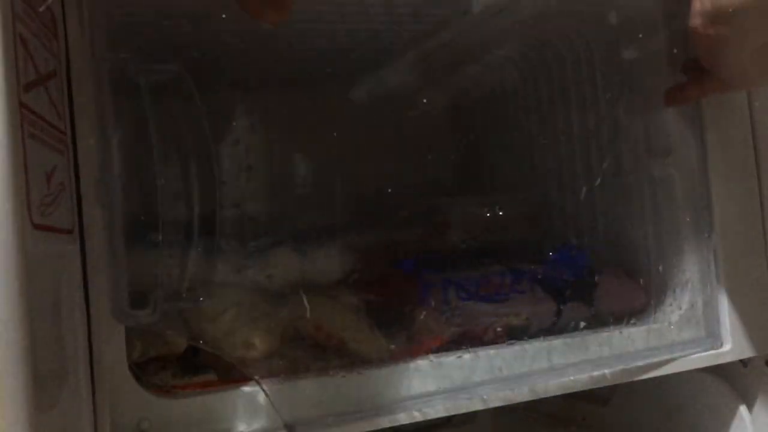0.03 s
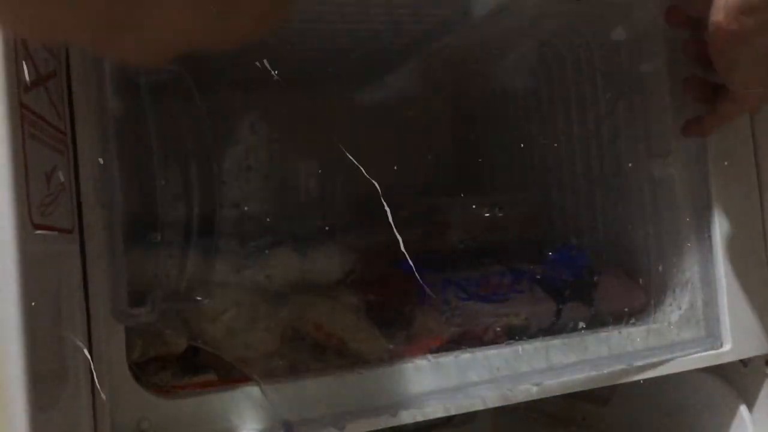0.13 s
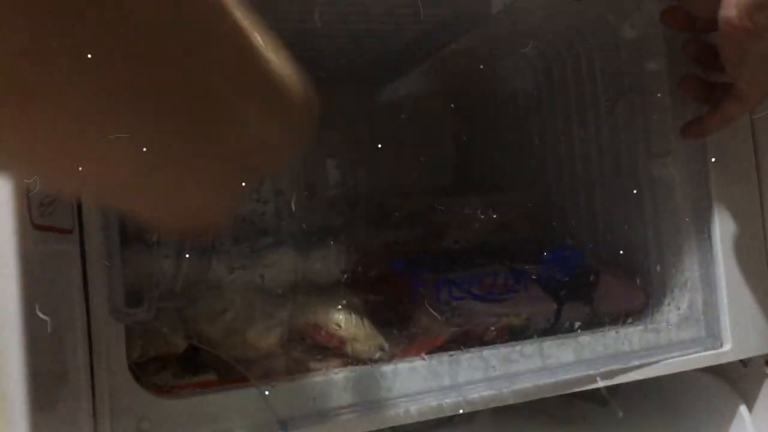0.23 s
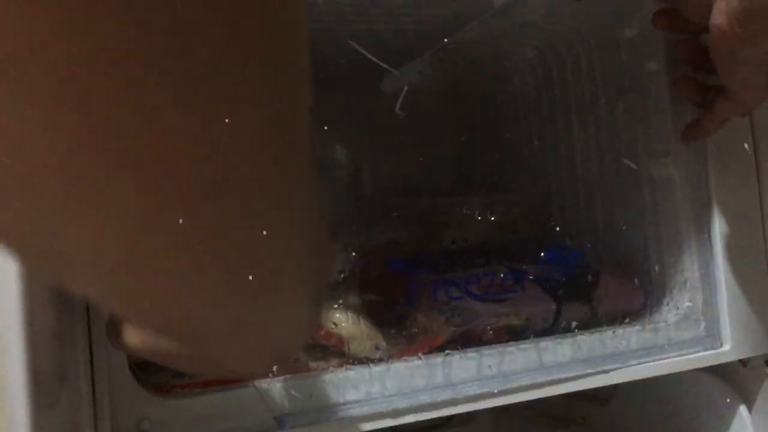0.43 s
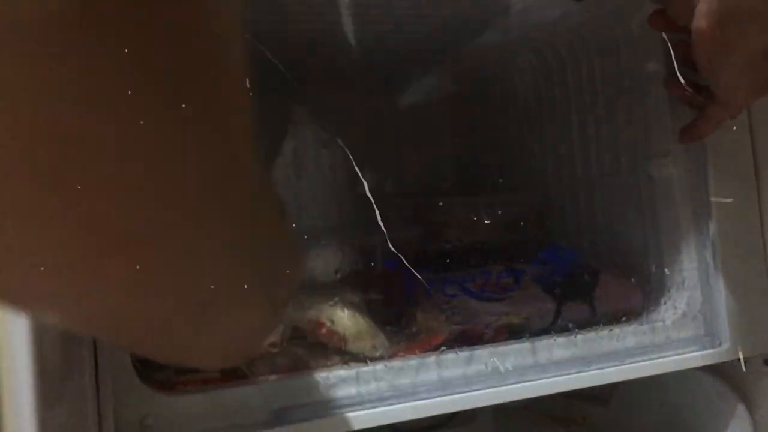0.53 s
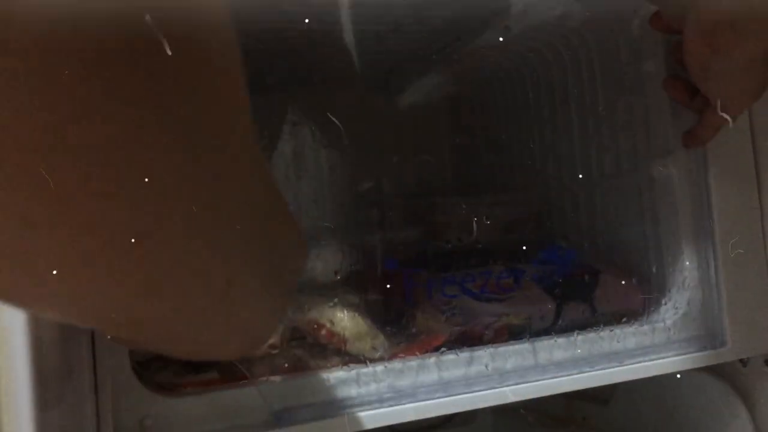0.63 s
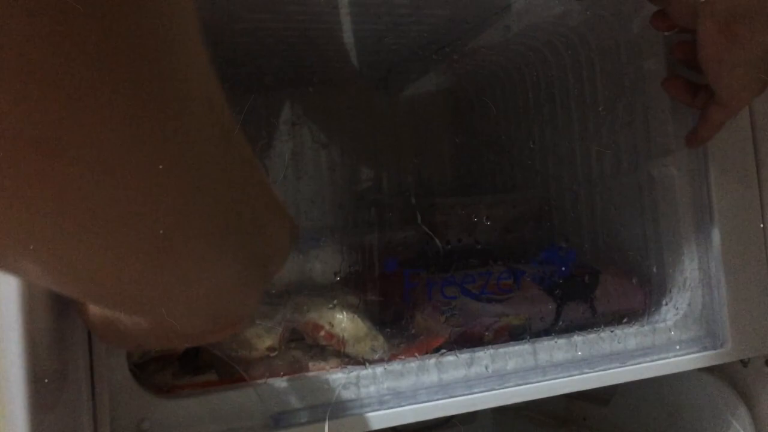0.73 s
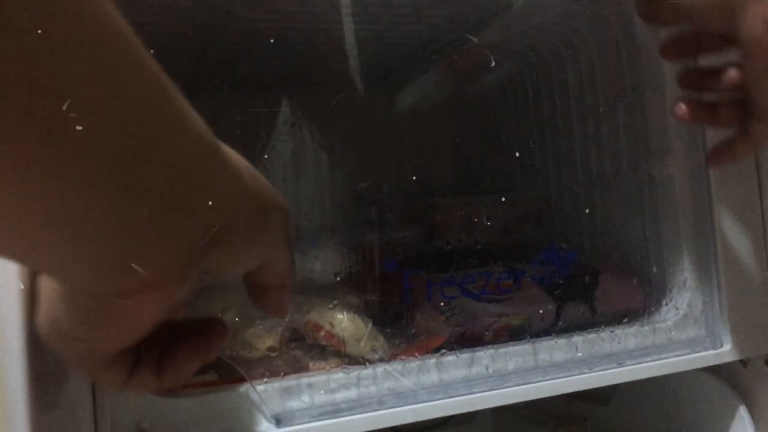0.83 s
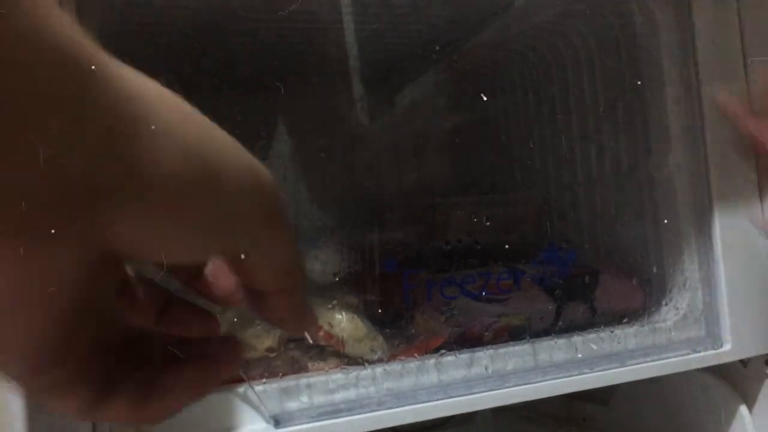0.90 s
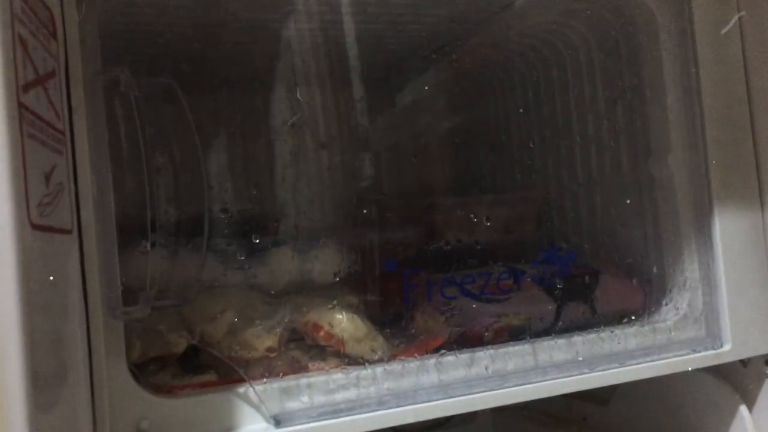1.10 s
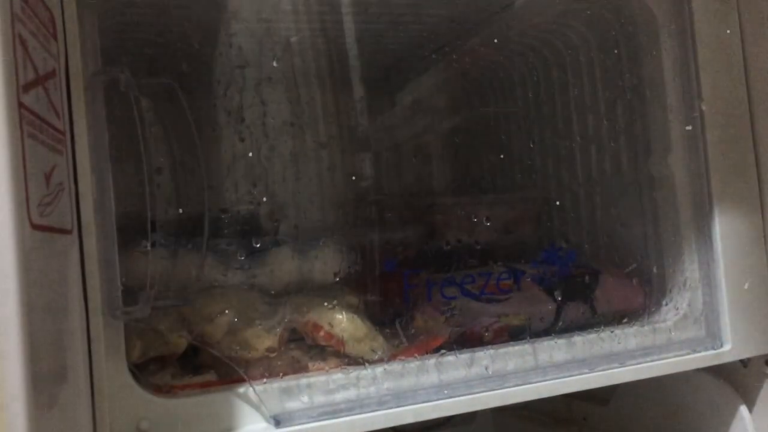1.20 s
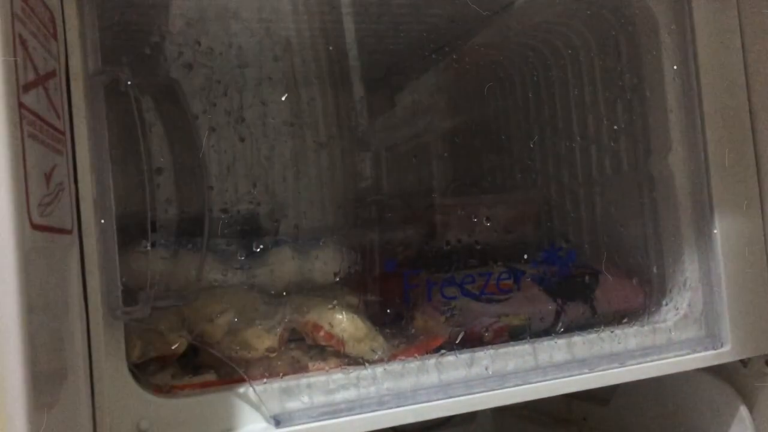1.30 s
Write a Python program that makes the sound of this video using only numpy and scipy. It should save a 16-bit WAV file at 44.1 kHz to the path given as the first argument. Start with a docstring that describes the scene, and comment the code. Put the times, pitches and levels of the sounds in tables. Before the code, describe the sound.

Close plastic knocks come from a cover being pushed onto a freezer compartment: a sharp clack, a softer bump, then a loud, hollow clunk as it seats. A low appliance hum continues in the quiet kitchen.

```python
"""Plastic scuffs and clacks, close by in a small kitchen: a clear cover is pressed onto a freezer compartment.
Its edge strikes, rubs and squeaks on the frame, ringing the plastic and the hollow behind it.
A hand bumps the panel, which flexes with dull thumps; it scrapes home and the hollow cabinet booms.
The appliance hums underneath."""
import sys
import numpy as np
from scipy import signal
from scipy.fft import rfft, irfft
from scipy.io import wavfile

SR = 44100
rng = np.random.default_rng(int(sys.argv[2]) if len(sys.argv) > 2 else 0)


def transcribe(signal):
    """Save signal, clipped to [-1, 1], as a 16-bit WAV file at the path in sys.argv[1]."""
    frames = np.atleast_2d(signal).T
    limited = np.clip(frames, -1, 1)
    pcm = np.round(limited * 32767).astype(np.int16)
    wavfile.write(sys.argv[1], SR, pcm)


N = 59535
T = np.arange(N) / SR
TAIL = T[:SR // 4]  # time axis of one contact


def amp(db):
    """Decibels to gain."""
    return 10 ** (np.asarray(db) / 20)


def unit(x):
    """Scale to rms 1."""
    return x / np.sqrt(np.mean(x ** 2) + 1e-20)


def at_hz(points, hz):
    """Interpolate a table over log frequency."""
    f, value = np.transpose(points)
    return np.interp(np.log(hz + 1), np.log(f + 1), value)


def add(mix, start_s, sound):
    """Mix a sound in at start_s."""
    part = mix[max(round(start_s * SR), 0):][:len(sound)]
    part += sound[:len(part)]


def colour(x, spectrum, tilt_db_oct):
    """Minimum-phase filter from a spectrum, tilted about 2 kHz."""
    hz = np.fft.rfftfreq(4096, 1 / SR)
    db = at_hz(spectrum, hz) + tilt_db_oct * np.log2(np.maximum(hz, 250) / 2000)
    log_gain = np.log(amp(np.r_[db, db[-2:0:-1]]))
    taps = np.fft.ifft(np.exp(np.conj(signal.hilbert(log_gain)))).real
    return signal.fftconvolve(x, taps[:len(hz)])[:len(x)]


def wander(rate_hz):
    """Random drift up to about rate_hz, rms 1."""
    hz = np.fft.rfftfreq(N, 1 / SR)
    return unit(irfft(rfft(rng.standard_normal(N)) * np.exp(-(hz / rate_hz) ** 2), N))


def fade(t, t60_s):
    """Exponential decay, 60 dB in t60_s."""
    return np.exp(-np.log(1000) * t / np.maximum(t60_s, 1e-3))


def ring(modes, t):
    """Decaying sines of a struck body."""
    return sum(amp(db) * fade(t, t60_s) * np.sin(2 * np.pi * hz * t) for hz, db, t60_s in modes)


def kitchen_air(level_db=-42.5):
    """Soft, low room noise; dips briefly after the boom."""
    # (frequency [Hz], relative density [dB])
    spectrum = [(15, 0), (35, -7.5), (65, -4), (110, -4), (160, -19), (300, -18.5), (500, -25.5),
                (800, -24.5), (1600, -26.5), (2500, -32.5), (5000, -43), (9000, -47.5), (15500, -53)]
    # (time [s], gain [dB])
    dip = [(.55, 1), (.63, -7.5), (.70, -8.5), (.74, 0), (.78, 0.5)]
    shape = amp(at_hz(spectrum, np.fft.rfftfreq(N, 1 / SR)))
    noise = unit(irfft(rfft(rng.standard_normal(N)) * shape, N))
    return amp(level_db + np.interp(T, *np.transpose(dip))) * noise


def appliance_hum(waver_hz=21.8, drift_rad=0.36):
    """Tones wavering in level and phase; they dip before the first loud clack and after the boom."""
    # (frequency [Hz], rms level [dB], waver depth [ratio])
    partials = [(118.3, -37, .22), (175, -54.5, .4), (228, -58, .6), (381, -57.5, .6), (759, -65, .5)]
    # (time [s], gain [dB])
    dips = [(.15, 0), (.18, -12), (.21, 0), (.58, 0), (.66, -22), (.755, -20), (.79, 0)]
    hum = np.zeros(N)
    for hz, db, depth in partials:
        envelope = amp(db) * np.sqrt(2) * (1 + depth * wander(waver_hz))
        drift = drift_rad * np.sqrt(hz / partials[0][0]) * wander(waver_hz)
        hum += envelope * np.sin(2 * np.pi * hz * T + drift)
    return hum * amp(np.interp(T, *np.transpose(dips)))


def squeaks(waver_rad=0.53, waver_hz=124):
    """Rubbed plastic sings briefly and unsteadily."""
    # (centre [s], length [s], pitch [Hz], level [dB])
    rubs = [(0.155, 0.019, 1260, -42.5), (0.185, 0.014, 586, -35.5), (0.805, 0.049, 385, -42.5)]
    out = np.zeros(N)
    for centre_s, length_s, hz, db in rubs:
        envelope = amp(db) * np.exp(-(2 * (T - centre_s) / length_s) ** 2)
        out += envelope * np.sin(2 * np.pi * hz * T + waver_rad * wander(waver_hz))
    return out


def panel_thumps():
    """The panel flexes under each push: one dull, damped tone."""
    # (time [s], level [dB], pitch [Hz], rise [s], t60 [s])
    pushes = [(0.2052, -22, 231.7, 0.0057, 0.14), (0.2151, -11.5, 113, 0.0097, .05),
              (.22, -37, 80, 0.0067, 0.071), (0.249, -20.5, 94, 0.0028, 0.045),
              (.3202, -16, 255, .0018, .022), (0.3281, -23, 85.4, .002, 0.04),
              (0.3297, -19, 268.5, 0.00069, 0.058), (.352, -25, 150.7, 0.0085, 0.093),
              (0.5367, -14, 136.4, 0.016, 0.13), (0.541, -13, 75, 0.053, .05),
              (0.782, -41.5, 134, 0.0064, 0.068)]
    out = np.zeros(N)
    for start_s, db, hz, rise_s, t60_s in pushes:
        envelope = np.minimum(T / rise_s, 1) * fade(np.maximum(T - rise_s, 0), t60_s)
        add(out, start_s, amp(db) * envelope * np.sin(2 * np.pi * hz * T))
    return out


def cabinet_boom(seat_s=0.539, rise_s=0.015):
    """The hollow cabinet rings as the cover seats."""
    # (frequency [Hz], level [dB], t60 [s])
    modes = [(74, -16.5, 0.4), (94, -22, 0.11), (208, -13.5, 0.13), (300, -22.5, 0.14), (371, -16, .12),
             (454.4, -12, 0.099), (697, -17.5, 0.11), (769.4, -22, 0.13)]
    out = np.zeros(N)
    add(out, seat_s, np.minimum(T / rise_s, 1) * ring(modes, T))
    return out


def compartment_echo():
    """Dense reflections in the compartment, each band dying at its own rate."""
    # (frequency [Hz], t60 [s])
    decay = [(100, 0.51), (500, 0.13), (2000, .14), (6000, 0.082), (15000, .105)]
    hz, t, bands = signal.stft(rng.choice([-1., 1.], len(TAIL)), SR, nperseg=128)
    bands *= fade(t, at_hz(decay, hz)[:, None])
    _, echo = signal.istft(bands, SR, nperseg=128)
    return unit(echo[:len(TAIL)])


def cover_response(tilt_db_oct, echo_db, crack_db=11.5, room_db=-17.5, ring_db=-35):
    """One touch of the cover: crack, room tail, compartment echo and modes; echo_db scales the last two."""
    # cover resonances (frequency [Hz], relative level [dB], t60 [s])
    modes = [(602, -9, .1), (938.5, -2, 0.11), (1146, -3.5, 0.056), (1387, -5, 0.063), (1535, -4, 0.064),
             (1722, 0, 0.063), (1942, 3, 0.033), (2437, 3.5, 0.03), (3480, -10.5, 0.12), (4200, -22, 0.058),
             (7235, -1, 0.073), (11850, -4, 0.031)]
    # dense ring of the plastic (frequency [Hz], gain [dB])
    plastic = [(40, -31), (180, -8), (400, -2), (900, -1.5), (1500, -1), (2700, -4.5), (4000, -4),
               (6500, -9), (9000, -14), (13000, -16.5), (16000, -21)]
    n = len(TAIL)
    crack = unit(rng.choice([-1., 1.], n) * fade(TAIL, t60_s=0.017))
    room = unit(rng.standard_normal(n) * fade(TAIL, t60_s=0.47))
    noise = (amp(crack_db) * crack + amp(echo_db) * compartment_echo() + amp(room_db) * room) / np.sqrt(n)
    ringing = sum(rng.choice([-1, 1]) * ring([mode], TAIL) for mode in modes)
    return colour(noise + amp(echo_db + ring_db) * ringing, plastic, tilt_db_oct)


def edge_scrapes(contacts=3, slips_per_s=4000, gain_db=-10):
    """The edge slides on the frame: tiny slips at a few points excite the cover as force swells and falls."""
    # (peak time [s], rise [s/20 dB], fall [s/20 dB], relative level [dB], tilt [dB/oct], echo [dB])
    slides = [(.155, 0.024, 0.032, -36.5, -2.5, 10), (.172, 0.031, 0.017, -48.5, 4, 0),
              (.204, 0.0082, 0.013, -24, -0.5, 8), (0.217, 0.017, 0.015, -19.5, -0.5, -9.5),
              (0.332, 0.011, 0.015, -34, 0.5, 1), (.357, .055, .013, -31.5, -3.2, -4),
              (.543, .017, 0.015, -19, 0.2, 10), (0.554, 0.015, .016, -13.5, 0.5, 10),
              (.793, 0.017, 0.027, -43, -2, 5), (1.324, 0.014, 0.037, -45, 1, -2)]
    out = np.zeros(N)
    for peak_s, rise_s, fall_s, db, tilt_db_oct, echo_db in slides:
        force = amp(db + gain_db) * 10 ** -np.maximum((peak_s - T) / rise_s, (T - peak_s) / fall_s)
        for _ in range(contacts):
            slipping = rng.random(N) < slips_per_s / SR
            slips = unit(slipping * rng.standard_normal(N)) / np.sqrt(contacts)
            out += signal.fftconvolve(slips * force, cover_response(tilt_db_oct, echo_db))[:N]
    return out


def edge_clacks():
    """The edge strikes the frame; each hit excites the cover once."""
    # (time [s], relative level [dB], tilt [dB/oct], echo [dB])
    hits = [(0.058, -34, 0.5, 12), (.133, -26.5, -1.5, 11), (0.2138, -3, 0.2, -5), (0.2157, -1.5, 0, 1.5),
            (0.3324, -21, 2.5, 2), (.334, -18.5, 1.5, 2), (0.5314, -26, 6.5, 11), (0.5376, -14, 0, 18),
            (0.5474, -12.5, 1, 14.5), (.5532, -10, 2.5, 10), (.558, -9.5, -4, 13), (0.794, -34, -1.5, 1),
            (1.029, -35, 1.5, 10)]
    out = np.zeros(N)
    for start_s, db, tilt_db_oct, echo_db in hits:
        add(out, start_s, amp(db) * cover_response(tilt_db_oct, echo_db))
    return out


def scene():
    """All sources, mono."""
    background = kitchen_air() + appliance_hum()
    return (background + edge_clacks() + edge_scrapes() + cabinet_boom() + panel_thumps() + squeaks())[None]


def record(dry, low_cut_hz=49, high_cut_hz=15800):
    """Microphone bass roll-off, then a steep treble limit."""
    highpass = signal.butter(2, low_cut_hz, "high", fs=SR, output="sos")
    lowpass = signal.firwin(801, high_cut_hz, window=("kaiser", 9), fs=SR)
    return signal.oaconvolve(signal.sosfilt(highpass, dry), lowpass[None], "same")


dry = scene()
out = record(dry)
transcribe(out)
```